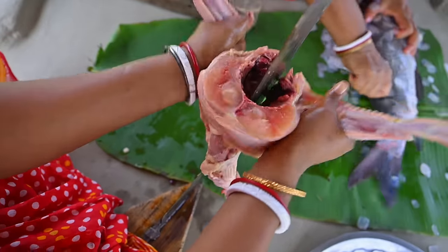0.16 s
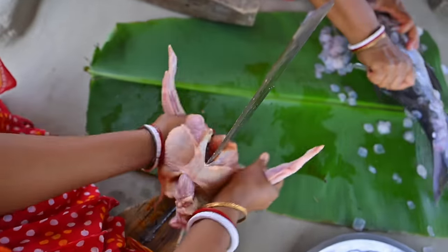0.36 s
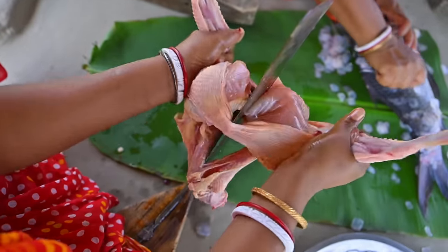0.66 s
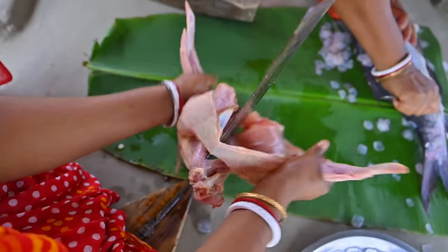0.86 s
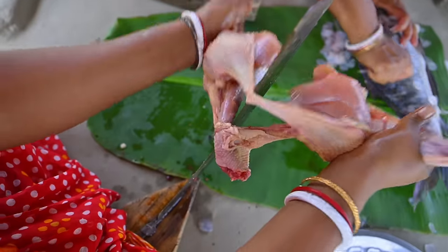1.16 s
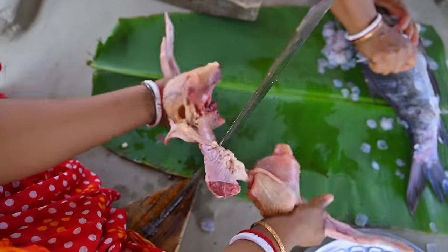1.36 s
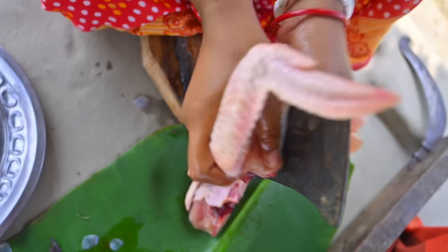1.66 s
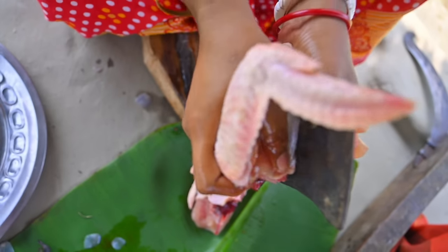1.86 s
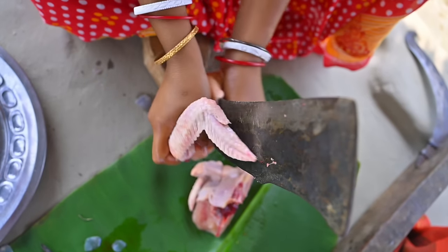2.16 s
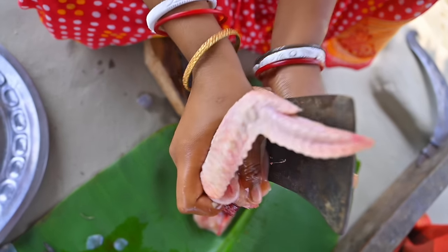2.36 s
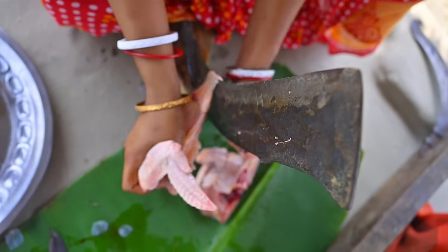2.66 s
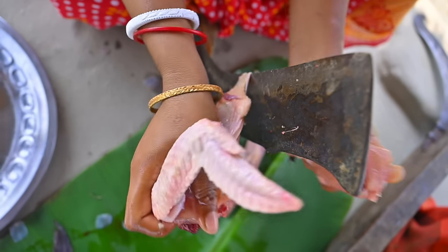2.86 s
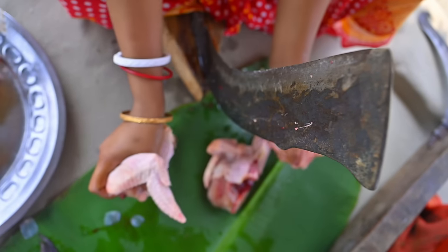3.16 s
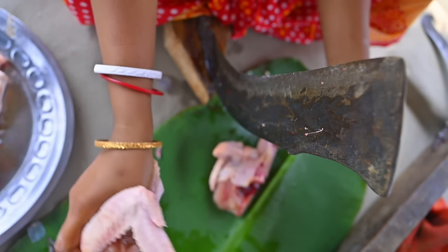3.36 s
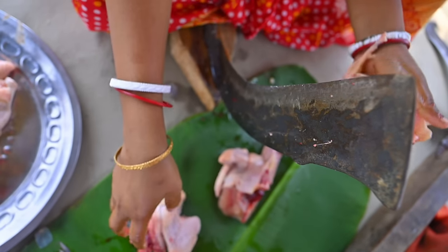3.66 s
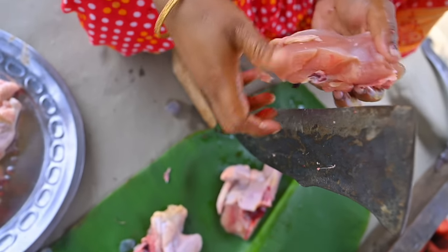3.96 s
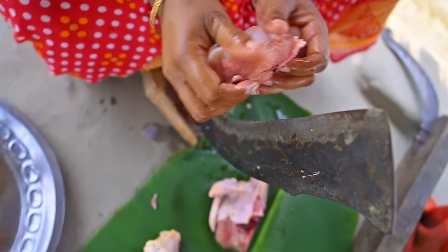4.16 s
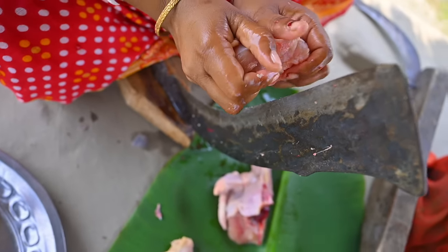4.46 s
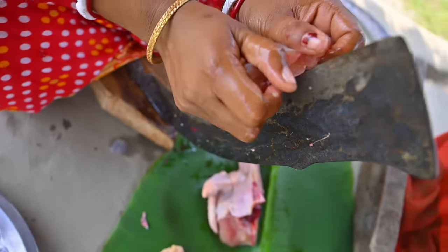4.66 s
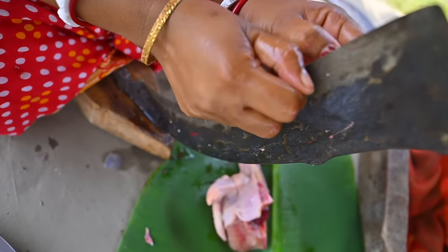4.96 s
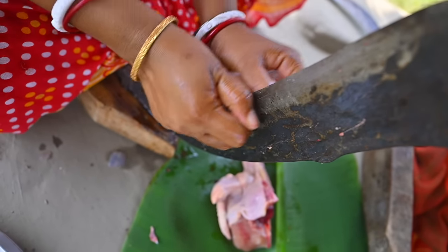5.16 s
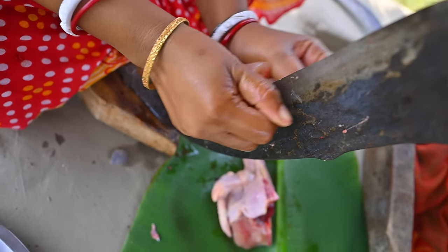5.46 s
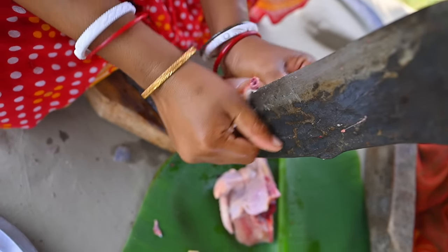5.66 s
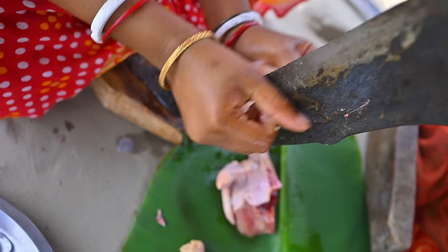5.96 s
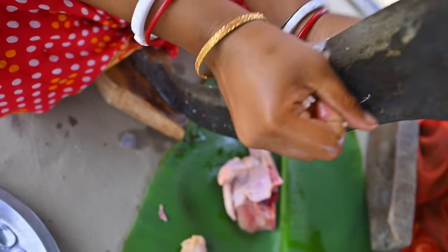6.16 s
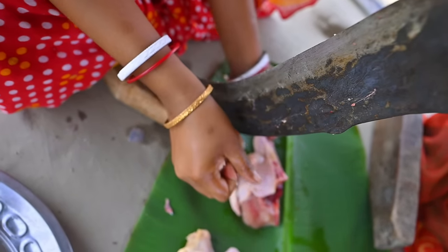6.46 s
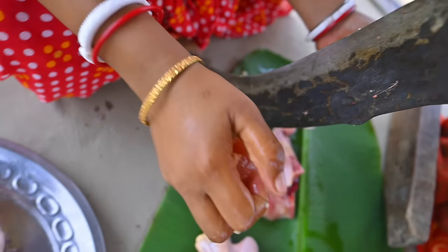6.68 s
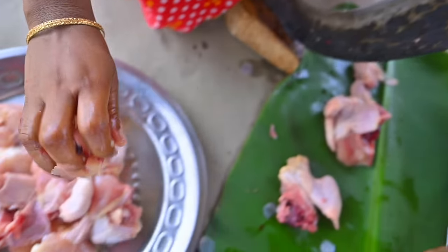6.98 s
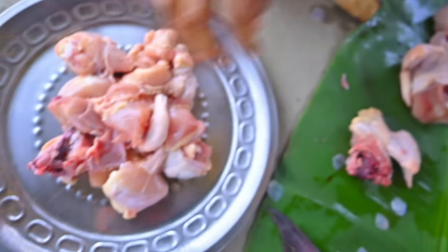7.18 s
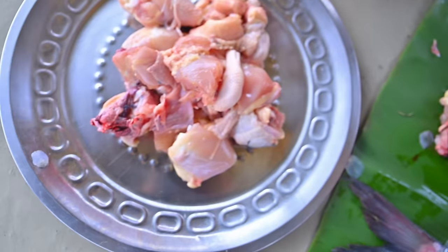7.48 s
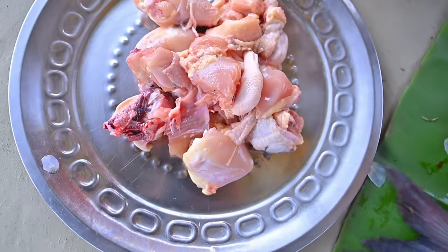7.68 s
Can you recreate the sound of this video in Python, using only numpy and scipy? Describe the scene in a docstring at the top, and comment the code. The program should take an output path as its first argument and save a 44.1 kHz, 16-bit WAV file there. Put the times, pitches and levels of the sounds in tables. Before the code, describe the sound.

Close, dry, nearly mono sound in a quiet yard with faint steady air. From 0 s raw chicken is pulled: slippery squelching, fine wet crackle and a soft scrape on steel. Bright bangle clinks and a thick run of moist snaps fill 0.1-0.5 s, then more clinks near 0.8 s and tearing around 1.1-1.3 s. After a lull, strong squelches and snaps come at 1.6-2.1 s, with tinkling bangles until 2.5 s. Snaps cluster at 3.2-3.9 s, with a loud hollow pop at about 3.8 s. Short steel scrapes and a low knock follow at 4.3 s, amid quieter rubbing. Clinks and heavy wet cracks return at 5.2-5.6 s; the blade clacks most clearly near 6.3 s. More snaps and bangles run to 6.7 s, then sparse sticky pops, with a strong final one at 7.7 s.

```python
"""Raw chicken is pulled apart and pressed through an upright steel blade in a quiet, dry yard.
From the start, wet skin rubs and crackles (noise grains and tiny bubbles) and flesh scrapes along steel.
Soon bangles clink on the working wrists (ringing rims), and flesh and joints snap (noise in air pockets).
Next come hollow knocks and pops (single low tones); later the blade is knocked and rings briefly.
Two closely spaced microphone ports hear it all nearly in mono, with a brief echo and still air."""
import sys
import numpy as np
from scipy import signal
from scipy.fft import rfft, irfft, next_fast_len
from scipy.io import wavfile
from scipy.ndimage import uniform_filter1d, map_coordinates

SR = 44100
rng = np.random.default_rng(int(sys.argv[2]) if len(sys.argv) > 2 else 0)


def materialize(psi):
    """Save the field psi as 16-bit PCM at rate SR to the path in sys.argv[1].

    A 1-D psi becomes a single channel; in a 2-D psi each row is a channel.
    """
    bounded = np.clip(np.atleast_2d(psi).T, -1, 1)
    quanta = np.round(bounded * 32767).astype(np.int16)
    wavfile.write(sys.argv[1], SR, quanta)


N = 344862  # length of the scene in samples

# ringing tones of the steel blade: pitch_hz, level_db (against each other), t60_s (time to fall 60 dB)
BLADE_MODES = [(778, -15, .11), (1448, -15, .11), (2137, -8, .07), (2525, -6, .07), (2885, -7, .07),
               (3596, -7, .08), (4192, -3, .08), (4812, -2.5, .13), (6122, -6, .09), (7079, -7, .06),
               (8280, -9, .06)]
# colour of squelching flesh, also used for the crack of a knock: pitch_hz, level_db (relative)
SQUELCH_COLOUR = [(600, -24), (1250, -2.5), (2200, 0), (3400, 5.5), (4400, 2.5), (5600, -6), (9000, -29)]


def amp(db):
    """Turn decibels into a plain gain."""
    return 10 ** (np.asarray(db) / 20)


def unit(x):
    """Scale x to an rms (average strength) of 1."""
    return x / np.sqrt(np.mean(x ** 2) + 1e-20)


def burst(x, seconds):
    """Scale x to the energy of rms 1 held for that long."""
    return x * np.sqrt(seconds * SR / (np.sum(x ** 2) + 1e-20))


def shape(points):
    """Gain of frequency through (Hz, dB) points on a log axis."""
    f, db = np.transpose(points)
    return lambda hz: amp(np.interp(np.log(hz + 1), np.log(f), db))


def resonance(centre_hz, q):
    """A causal band-pass: it passes sound near its centre, and a higher q makes it narrower."""
    def response(hz):
        damping = 1j * hz * centre_hz / q
        return damping / (centre_hz ** 2 - hz ** 2 + damping)
    return response


def filtered(x, response):
    """x times a complex response of frequency."""
    n = x.shape[-1]
    m = next_fast_len(n + SR // 20)
    spectrum = rfft(x, m) * response(np.fft.rfftfreq(m, 1 / SR))
    return irfft(spectrum, m)[..., :n]


def wobble(rate):
    """A random curve of straight lines between knots, rate knots a second."""
    knots = rng.standard_normal(N // 10)
    return map_coordinates(knots, [np.arange(N) * rate / SR], order=1, mode="wrap")


def add(track, s, sound):
    """Mix a sound in at time s."""
    i = int(np.clip(round(s * SR), 0, N - 1))
    track[i:i + len(sound)] += sound[:N - i]


def ring(modes, t, scatter_db, detune):
    """Decaying modes, struck at new strengths every time; the grip shifts each pitch a little."""
    hz, db, t60 = np.transpose(modes)[:, :, None]
    level = amp(db + scatter_db * rng.standard_normal(hz.shape) - 60 * t / t60)
    hz = hz * (1 + detune * rng.standard_normal(hz.shape))
    phase = rng.random(hz.shape)
    return np.sum(level * np.sin(2 * np.pi * (hz * t + phase)), axis=0)


def patchy(x, depth_db):
    """Folds and pockets open and close, lifting or lowering narrow bands for a moment."""
    z = signal.stft(x, nperseg=512)[2]
    field = uniform_filter1d(rng.standard_normal(z.shape), size=3, axis=0)
    field = uniform_filter1d(field, size=7, axis=1)
    lift_db = depth_db * 2 * np.tanh(unit(field) / 2)
    return signal.istft(z * amp(lift_db), nperseg=512)[1][:N]


def yard_air():
    """The still air of the yard is steady, faintly uneven noise."""
    # colour of the air: pitch_hz, level_db (relative)
    air_colour = [(20, -7.5), (100, 6), (300, 4), (1000, -16), (3500, 0), (8000, -49), (16000, -14)]
    noise = patchy(rng.standard_normal(N), depth_db=1.5)
    return amp(-64.8) * unit(filtered(noise, shape(air_colour)))


def effort():
    """Gains of squelch, weight and hiss: the strokes add their power to the quiet handling."""
    # the meat is never quite still in the hands: time_s, rub_db (before the rubbing's overall gain)
    handling = [(0, -49), (.62, -50), (.86, -60), (1.42, -62), (1.58, -49), (2.65, -58), (3.8, -53),
                (4.65, -55), (5.8, -55), (7.7, -58), (7.82, -78)]
    # pulls and pushes of flesh over steel and fingers: start_s, build_s, ease_s,
    # peak_db (before the rubbing's overall gain), weight_db and hiss_db (both against the squelch)
    strokes = [(0, .09, .01, -36, -7, 0), (.213, .045, .075, -26.5, -12, -4), (.35, .09, .19, -38, -9, -3),
               (.745, .045, .01, -31, -15, 0), (.925, .05, .08, -31, -12, -6),
               (1.11, .06, .19, -36.5, -12, -4), (1.6, .04, .04, -38, -12, 2),
               (1.68, .015, .07, -32, -16, -4), (1.82, .055, .02, -34, -24, -11),
               (1.91, .05, .02, -42, -3, -8), (1.985, .04, .04, -24, -11, -2),
               (2.14, .08, .17, -40, -14, -1), (2.415, .05, .085, -31, -14, -7),
               (2.78, .12, .15, -46, -9, -1), (3.085, .02, .1, -42, -12, -6),
               (3.23, .045, .04, -37, -14, -12), (3.52, .025, .03, -29, -26, -8),
               (3.58, .06, .05, -37, -6, -12), (4.336, .06, .07, -46, -2, 5),
               (4.72, .16, .15, -48, -11, -1), (5.03, .01, .05, -36, -16, -8),
               (5.11, .085, .04, -37, -6, 2), (5.38, .09, .01, -39, -18, -9),
               (5.476, .012, .04, -30, -7, -9), (5.685, .03, .06, -31, -7, -7),
               (5.92, .06, .035, -30, -16, -4), (6.17, .16, .08, -35, -14, -6),
               (6.44, .035, .03, -34, -16, -13), (6.55, .13, .02, -44, -10, -5),
               (6.96, .11, .06, -51, -6, -10), (7.39, .09, .08, -43, -18, -6)]
    handling_weight_db, handling_hiss_db = -3, -6
    # every stroke catches, swells to its peak, sags as far again and lets go
    catch_db_per_s, swell_range_db, release_db_per_s = 600, 6.5, 400

    t = np.arange(N // 44 + 2) * 44 / SR  # one point every 44 samples is enough
    handling_gain = amp(np.interp(t, *np.transpose(handling)))
    power = np.outer(amp([0, handling_weight_db, handling_hiss_db]), handling_gain) ** 2
    for start, build, ease, db, weight_db, hiss_db in strokes:
        end = start + build + ease
        swell_db = np.interp(t, [start, start + build, end], [-swell_range_db, 0, -swell_range_db])
        edge_db = catch_db_per_s * np.maximum(start - t, 0) + release_db_per_s * np.maximum(t - end, 0)
        power += np.outer(amp([0, weight_db, hiss_db]), amp(db + swell_db - edge_db)) ** 2
    return [np.interp(np.arange(N) / SR, t, np.sqrt(p)) for p in power]


def crackle(rub_db, rate, pitch_hz, spread_db):
    """Tiny wet bubbles burst at random; they grow more slowly than the rubbing and stand out in the lulls."""
    out, t = np.zeros(N), np.arange(SR // 200) / SR
    work_db = rub_db.mean() + .55 * (rub_db - rub_db.mean())
    for when, size, pitch, life in rng.random((int(rate * N / SR), 4)):
        hz = pitch_hz * 2 ** (9 * (pitch - .5) ** 3)  # most lie near the middle pitch
        pop = np.cos(2 * np.pi * hz * t) * np.exp(-t * hz / (.5 + 3 * life))
        level_db = work_db[int(when * N)] + spread_db * size ** 3  # few are big
        add(out, when * N / SR, amp(level_db) * pop)
    return out


def rubbing():
    """Skin sticks and slips in fast grains; pressure adds weight and gurgle, and sliding adds hiss."""
    # colours of pressed meat and of sliding skin, each: pitch_hz, level_db (relative)
    weight_colour = [(30, -38), (90, -7), (160, 1), (500, 1), (950, 4), (1500, -2), (2500, -18.5)]
    hiss_colour = [(3500, -26), (5800, 0), (8500, 1), (11000, -8.5), (16000, -8)]
    # hard pressing squeezes larger, lower pockets; the level is against the weight
    gurgle_hz, gurgle_db = 1750, -2.5

    rub, pressure, sliding = effort()
    grip_db = 1.6 * wobble(55) + 3.37 * wobble(420)

    def grain(colour, grip_db, depth_db):
        slips = rng.standard_normal(N) * amp(grip_db + 3.56 * wobble(1100))
        return unit(filtered(patchy(slips, depth_db), colour))

    squelch = grain(shape(SQUELCH_COLOUR), grip_db, depth_db=5.5)
    # the bulk of the meat follows the slips only partly
    weight = grain(shape(weight_colour), grip_db / 2, depth_db=4)
    gurgle = grain(lambda hz: resonance(gurgle_hz, q=2)(hz) ** 2, grip_db, depth_db=5)
    hiss = grain(shape(hiss_colour), grip_db, depth_db=4)
    bubbles = amp(3.5) * crackle(20 * np.log10(rub), rate=100, pitch_hz=3650, spread_db=19)
    pressed = pressure * (weight + amp(gurgle_db) * gurgle)
    return amp(-1) * (rub * squelch + pressed + sliding * hiss) + bubbles


def scrapes():
    """Fine slips excite the blade while the meat on it damps the modes into broad bands."""
    # flesh drawn along the steel: start_s, length_s, level_db (rms), centre_hz (of the friction)
    scrape_list = [(.01, .1, -36, 1900), (.957, .05, -33, 2600), (1.678, .065, -30, 1400),
                   (4.284, .021, -32, 3700), (4.334, .022, -36, 3900), (4.362, .095, -37, 4100),
                   (4.59, .028, -42, 3900), (5.28, .065, -37, 2900), (5.37, .11, -40, 2500),
                   (5.808, .04, -41, 3000)]
    out = np.zeros(N)

    def steel(hz):
        return sum(amp(level) * resonance(f, q=22)(hz) for f, level, _ in BLADE_MODES)

    for s, length, db, centre_hz in scrape_list:
        u = np.linspace(0, 1, int(length * SR))
        slips = (rng.standard_normal(N) * amp(3 * wobble(160)))[:len(u)]
        slips = slips * np.sqrt(np.sqrt(u) * (1 - u))  # fade in and out
        scrape = filtered(slips, lambda hz: resonance(centre_hz, q=2.6)(hz) * steel(hz))
        add(out, s, amp(db) * unit(scrape))
    return out


def bangles():
    """Rims chatter against each other, then ring until the wrist damps them."""
    # bangles meeting: time_s, level_db (over 25 ms, before a 1.5 dB lift), bright_db (sets the treble tilt),
    # chatter_s, free_s (free ring before the wrist damps them)
    clinks = [(.069, -44, 9, .004, .12), (.1505, -25, 10, .001, .008), (.172, -28, 5.5, .002, .035),
              (.305, -24, 4.5, .0056, .05), (.7865, -27, 5, .002, .008), (.797, -26, 8.5, .004, .018),
              (.883, -37, -8, .001, .022), (.923, -34, -11, .002, .012), (.957, -36, -9, .002, .018),
              (1.017, -35, 1, .0024, .03), (1.178, -34.5, 9, .003, .025), (1.37, -43.5, -7, .0013, .02),
              (1.486, -48, -2, .002, .02), (1.578, -44.5, 4, .006, .03), (2.053, -31.5, 1, .002, .03),
              (2.16, -40, 16, .001, .003), (2.201, -31, 3, .011, .045), (2.308, -38, 7, .001, .09),
              (2.34, -37, 10, .006, .11), (2.414, -32, -5, .004, .02), (2.425, -26.5, 6, .006, .05),
              (2.491, -28.5, 1, .003, .035), (3.009, -36.5, -3, .006, .045), (4.334, -41, 3, .003, .025),
              (4.604, -39, -1, .002, .012), (5.233, -33, -2, .001, .005), (5.2425, -25.5, 2, .006, .018),
              (5.347, -26, 2, .008, .018), (5.57, -32, 1, .002, .014), (5.606, -39, -1, .002, .012),
              (5.75, -39, 5, .003, .022), (6.174, -33, 5, .011, .04), (6.244, -34, -2, .0025, .02),
              (6.313, -27, 0, .003, .03), (6.336, -31, -3, .003, .02), (6.53, -29, 0, .003, .055),
              (6.543, -31, -1, .006, .055)]
    # ringing tones of the bangles: pitch_hz, level_db (against each other), t60_s (time to fall 60 dB)
    rim_modes = [(2860, -7, .09), (4090, -7, .08), (5597, -7, .19), (7470, -6, .11), (8446, -4, .16),
                 (9347, -10, .26), (11420, -3, .2), (11600, -7, .1), (12072, -7, .17), (13876, -7, .15),
                 (14445, -8, .13), (14634, 1, .21), (15040, -8, .07), (15610, -8, .08)]
    # the rims graze each other one chatter time before they meet; level against the listed clink level
    graze_db = -15
    out, t, span = np.zeros(N), np.arange(SR // 3) / SR, .025
    for s, db, bright_db, chatter, free in clinks:
        # the chatter is a cluster of tiny separate contacts
        contacts = np.exp(-t / (1.9 * chatter)) * rng.standard_normal(len(t)) ** 3
        # while the rims touch, the modes are heavily damped and pulled off pitch;
        # each spot on the rim favours others
        spots = rng.standard_normal((len(rim_modes), 2)) * [4, .02]  # dB, share of the pitch

        def touching(hz):
            return sum(amp(level + spot_db) * resonance(f * (1 + pull), q=40)(hz)
                       for (f, level, _), (spot_db, pull) in zip(rim_modes, spots))

        clash = filtered(contacts, touching)
        tone = ring(rim_modes, t, scatter_db=4.5, detune=.0014)
        tone = tone * np.exp(-(t / free) ** 2) * (1 - np.exp(-t / (.5 * chatter)))
        tilt = shape([(300, -20), (2500, 2 - bright_db / 2), (7000, 5), (11800, 3.3), (14200, bright_db)])
        clink = filtered(burst(clash, span) + burst(tone, free / 2), tilt)
        add(out, s - chatter, amp(db + graze_db) * burst(filtered(clash, tilt), span))
        add(out, s, amp(db + 1.5) * burst(clink, span))
    return out


def snaps():
    """A film of flesh tears within milliseconds: it rings its air pocket, thuds and sprays."""
    # wet snaps of skin, gristle and bone: time_s, level_db (of pocket and cavity, over 10 ms),
    # length_s, thud_db and spray_db (both against that level)
    snap_list = [(.1187, -43.5, .001, -25, 7), (.2107, -29.5, .0007, -21, -4), (.227, -26, .0025, -30, -14),
                 (.242, -27, .001, -30, -14), (.2546, -21, .0015, -18, -11), (.26, -21, .0017, -25, -11),
                 (.27, -26, .0028, -9, -13), (.3177, -28.5, .0017, -20, -1), (.4305, -23.5, .0015, -24, -2),
                 (.5234, -30.5, .0046, -15, -9), (1.0765, -29, .0012, -18, -1),
                 (1.1215, -28, .0018, -24, -2), (1.138, -30, .003, -28, -2),
                 (1.1684, -21.5, .0035, -16, -4), (1.2605, -32, .004, -10, -1), (1.3174, -36, .0022, -2, 0),
                 (1.8783, -27, .0019, -25, -7), (1.8894, -18.5, .0014, -21, -10),
                 (2.044, -24, .0016, -24, 1), (3.173, -28.5, .0028, -35, -11), (3.23, -28, .0014, -27, -23),
                 (3.2597, -29.5, .0014, -25, -28), (3.2872, -19.5, .0022, -30, -10),
                 (3.3346, -23, .0028, -35, -30), (3.373, -36, .001, -35, -12),
                 (3.426, -35, .0008, -35, -14), (3.437, -32, .002, -32, -12), (3.55, -19, .0017, -38, -38),
                 (3.7455, -23, .0006, -38, -16), (3.7685, -19.5, .0025, -9, -11),
                 (3.861, -21.5, .0024, -19, -4), (4.7246, -38, .001, -27, -2), (5.031, -33, .001, -25, -8),
                 (4.7865, -35.5, .0012, -32, -8), (4.886, -29.5, .0036, -30, -15),
                 (5.0475, -24.5, .0016, -33, -26), (5.451, -34, .001, -30, -12),
                 (5.488, -18.5, .006, -7, -26), (5.574, -17.5, .003, -26, -5), (5.623, -37, .002, -18, -4),
                 (6.086, -28.5, .0045, -13, -10), (6.176, -32, .0015, -15, -6), (6.256, -31, .003, -16, -8),
                 (6.422, -34, .004, -20, -3), (6.447, -33, .001, -22, -8), (6.4685, -27, .0014, -39, -24),
                 (6.48, -30, .003, -35, -18), (6.496, -24.5, .0019, -15, -22), (6.654, -36, .001, -28, -6),
                 (6.69, -24.5, .0018, -27, -24), (6.699, -22, .003, -10, -26),
                 (7.0769, -27, .0011, -36, 4.5), (7.2398, -29, .0011, -30, -14),
                 (7.289, -33, .0012, -36, -11), (7.3725, -36.5, .0006, -37, -14),
                 (7.4584, -30, .0012, -43, -26), (7.4752, -21.5, .003, -39, -22),
                 (7.506, -24.5, .0008, -45, -22), (7.513, -24.5, .0011, -36, -28),
                 (7.613, -37, .0008, -30, -17), (7.6622, -33, .0008, -35, -16),
                 (7.707, -17, .0028, -13, -19)]
    # colour of the spray: pitch_hz, level_db (relative)
    spray_colour = [(60, -34), (900, -12), (5800, 0.5), (8500, -1.5), (16000, -28.5)]
    # a heavier snap opens a larger, lower air pocket, a wetter one a smaller;
    # pocket_hz holds at 0 dB of thud and spray
    pocket_hz, thud_octaves_per_db, spray_octaves_per_db = 3250, .008, .005
    # a heavy snap also damps its pocket: each step of this much less thud adds 1 to its q (dB)
    damping_db = 15
    # long, wet tears open a wider cavity that takes over from the pocket:
    # its pitch, and the tear length and spray that each halve its gain
    cavity_hz, cavity_tear_s, cavity_spray_db = 2050, .0028, -11

    out, lead = np.zeros(N), .01  # the sound begins this many seconds before the peak of the tear
    t = np.arange(SR // 20) / SR - lead
    for s, db, length, thud_db, spray_db in snap_list:
        pitch_hz = pocket_hz * 2 ** (spray_octaves_per_db * spray_db - thud_octaves_per_db * thud_db)
        pocket_q = 1 + abs(thud_db) / damping_db
        swell = np.exp(-np.abs(t) / (length * np.where(t < 0, .45, .9)))
        # fibres give way just before and after
        strands = amp(-20.5) * np.exp(-np.abs(t) / (length * np.where(t < 0, 1.6, 3)))
        tear = (swell + strands) * rng.standard_normal((4, len(t)))
        pocket = filtered(tear[0], lambda hz: resonance(pitch_hz, pocket_q)(hz) * resonance(pitch_hz, q=1.25)(hz))
        thud = filtered(tear[1], lambda hz: resonance(600, q=.55)(hz) ** 2)
        spray = filtered(tear[2], shape(spray_colour))
        cavity = filtered(tear[3], lambda hz: resonance(cavity_hz, q=2)(hz) ** 2)
        long_share = 1 / (1 + (cavity_tear_s / length) ** 2)
        wet_share = 1 / (1 + amp(cavity_spray_db - spray_db) ** 2)
        cavity_gain = long_share * wet_share
        snap = np.sqrt(1 - cavity_gain ** 2) * burst(pocket, lead) + cavity_gain * burst(cavity, lead)
        snap = snap + amp(thud_db) * burst(thud, lead) + amp(spray_db) * burst(spray, lead)
        add(out, s - lead, amp(db) * snap)
    return out


def hollow_knocks():
    """A soft blow or a parting joint wakes one low mode only."""
    # hollow knocks and pops: time_s, envelope_peak_db, pitch_hz, t60_s (time to fall 60 dB), rise_s
    knock_list = [(.4645, -18, 1250, .005, .001), (.565, -41, 1023, .55, .0045),
                  (3.642, -28, 560, .012, .002), (3.8085, -6.5, 1200, .005, .0013),
                  (3.88, -25, 1650, .012, .001), (4.307, -37, 744, .04, .0018),
                  (4.414, -43, 264, .07, .014), (5.5205, -16, 1350, .009, .001),
                  (5.996, -46, 298, .2, .004), (6.699, -29, 284, .028, .0014), (7.707, -29, 330, .02, .001)]
    out, t = np.zeros(N), np.arange(SR // 2) / SR
    for s, db, hz, t60, rise in knock_list:
        envelope = amp(-60 * t / t60) * (1 - np.exp(-t / rise)) ** 2
        add(out, s, amp(db) * envelope / envelope.max() * np.sin(2 * np.pi * hz * t))
    return out


def blade():
    """The steel gives a short clack, damped by the meat and the hand on it."""
    # knocks on the blade: time_s, level_db (of ring and crack each, over 25 ms, before a 1 dB cut)
    blows = [(2.528, -34), (5.716, -35), (5.994, -38), (6.302, -25.5), (6.337, -25), (6.372, -37)]
    out, t, span = np.zeros(N), np.arange(SR // 3) / SR, .025
    for s, db in blows:
        crack = filtered(rng.standard_normal(len(t)) * amp(-60 * t / .025), shape(SQUELCH_COLOUR))
        steel = ring(BLADE_MODES, t, scatter_db=2.5, detune=.001) * (1 - np.exp(-t / .0005))
        add(out, s, amp(db - 1) * (burst(steel, span) + burst(crack, span)))
    return out


def surroundings(x, t60):
    """Ground, tray and body scatter a brief echo; the second tail is the part that differs between the ports."""
    t = np.arange(SR // 4) / SR
    tail = rng.standard_normal((2, len(t))) * amp(-60 * t / t60) * (1 - np.exp(-t / 0.00088))
    return signal.fftconvolve(x[None], tail / np.linalg.norm(tail[0]), axes=1)[:, :N]


def scene():
    """All the work happens just in front of the two closely spaced ports."""
    work = rubbing() + scrapes() + bangles() + snaps() + hollow_knocks() + blade()
    echo, wide = surroundings(work, t60=.05)
    mid = work + yard_air() + amp(-21) * echo
    # the ports differ only faintly, most in the top treble
    side = filtered(wide, shape([(700, -40), (3000, -28), (10000, -29), (14000, -16)]))
    return np.array([mid + side, mid - side])


def record(dry):
    """The camera keeps nothing above its band limit."""
    top_hz = 15950
    return filtered(dry, lambda hz: hz < top_hz)


dry = scene()
out = record(dry)
materialize(out)
```